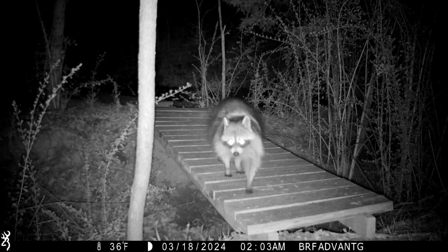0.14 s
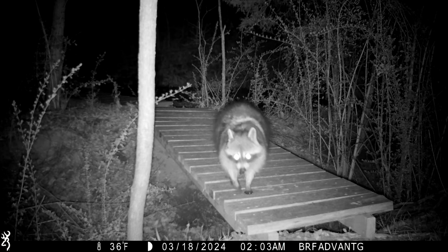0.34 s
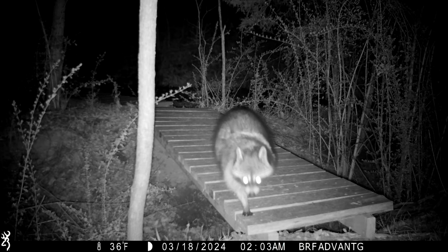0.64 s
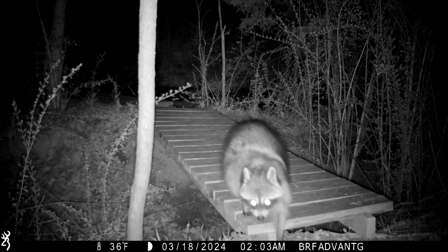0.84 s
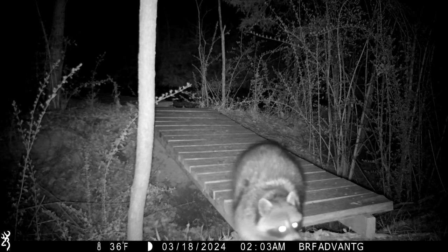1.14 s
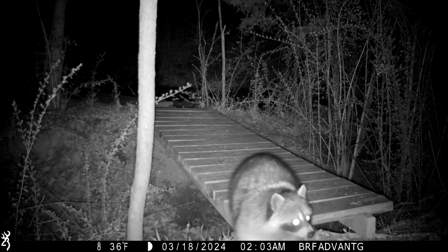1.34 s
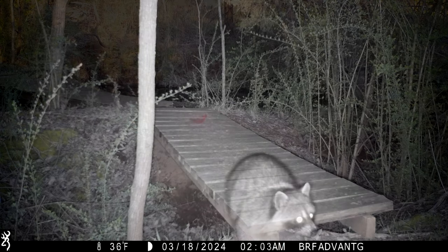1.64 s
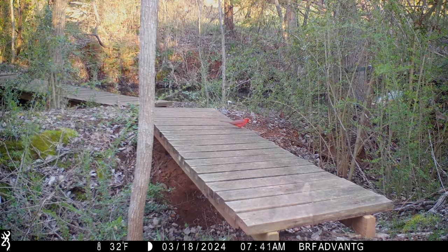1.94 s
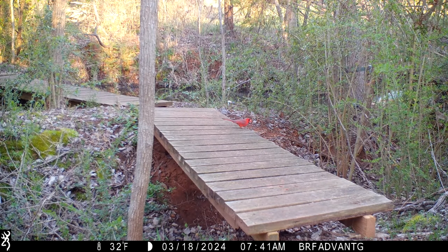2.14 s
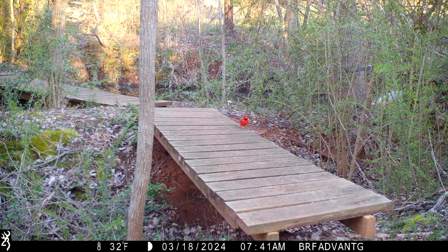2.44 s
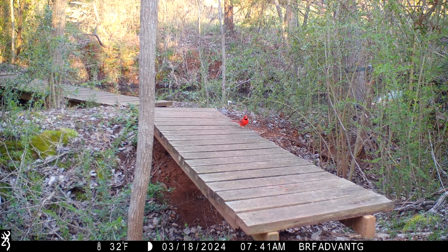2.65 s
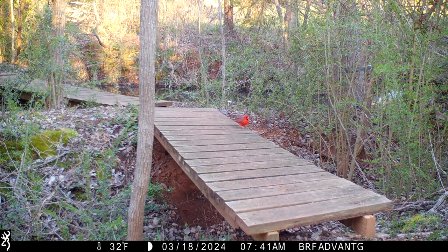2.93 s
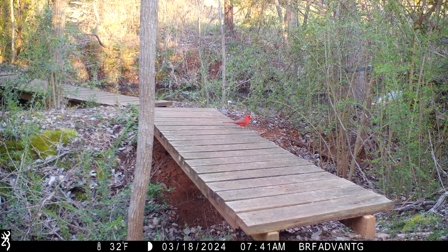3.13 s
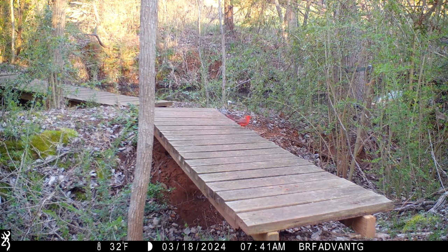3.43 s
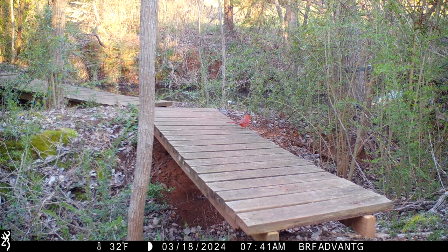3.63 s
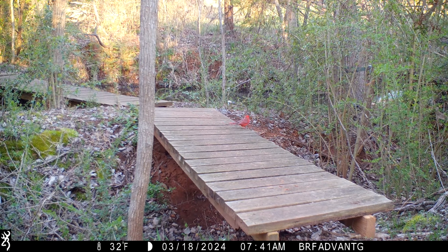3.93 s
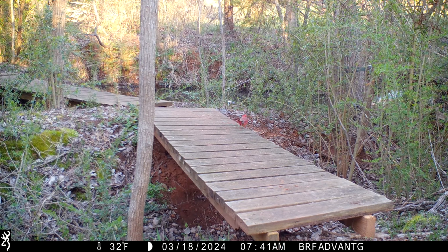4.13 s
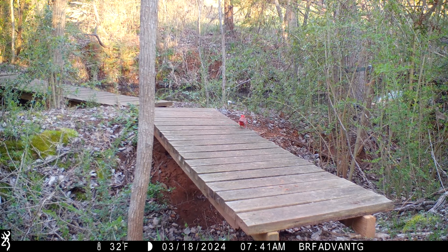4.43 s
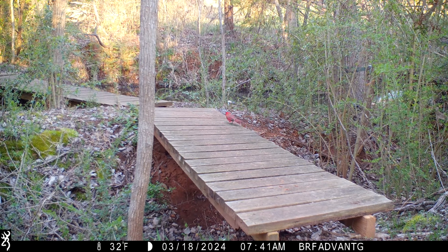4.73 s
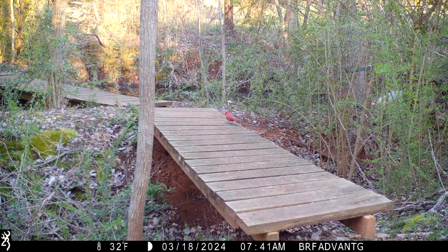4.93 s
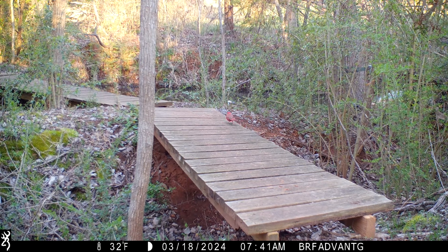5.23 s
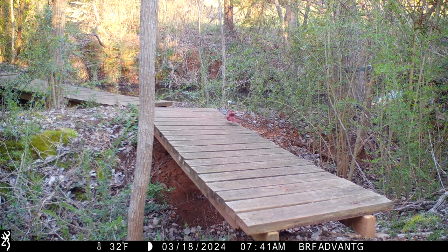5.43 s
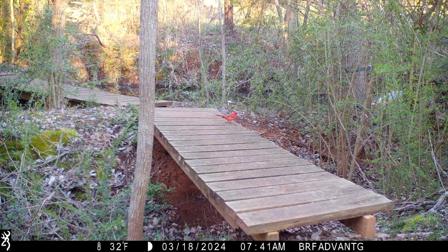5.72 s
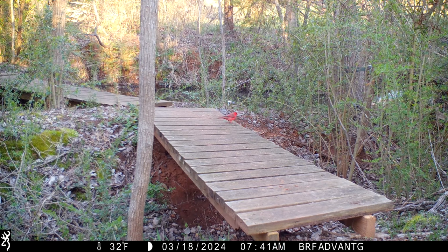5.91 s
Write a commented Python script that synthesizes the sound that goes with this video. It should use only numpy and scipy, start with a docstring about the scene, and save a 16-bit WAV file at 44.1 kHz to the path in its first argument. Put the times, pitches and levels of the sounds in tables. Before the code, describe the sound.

Quiet woodland with low far-off road noise and slight hiss; sparse chips, a rippling wren song, then bold upward-slurred cardinal whistles to the end.

```python
"""In a wood, heard through a trail camera, a wren rolls one phrase over and over,
then a nearer cardinal gives loud rising whoops. Each bird is a gliding near sine with faint overtones.
The wren and cardinal echo off ground and trunks, all song scatters, and small birds add thin chips and lisps.
Far traffic is shaped noise, with wandering engine tones once night gives way to morning.
The camera adds a faint whine with ticks and hiss."""
import sys
import numpy as np
from scipy import signal
from scipy.fft import rfft, irfft, next_fast_len
from scipy.io import wavfile

SR = 44100
rng = np.random.default_rng(int(sys.argv[2]) if len(sys.argv) > 2 else 0)


def to_wav(s):
    """Save 16-bit WAV."""
    ch = np.atleast_2d(s).T  # columns
    pcm = np.round(np.clip(ch, -1, 1) * 32767)  # PCM
    wavfile.write(sys.argv[1], SR, pcm.astype(np.int16))


N = 267687
TIME = np.arange(N) / SR


def from_db(db):
    """Decibels to gain."""
    return 10 ** (np.asarray(db) / 20)


def rms_one(x):
    """Scale to rms 1."""
    return x / np.sqrt(np.mean(x ** 2) + 1e-20)


def along(rows, t):
    """Each column of a curve, read at the times t."""
    seconds, *columns = np.transpose(rows)
    seconds = np.maximum.accumulate(seconds)
    return [np.interp(t, seconds, column) for column in columns]


def at_hz(points, hz):
    """The dB of a spectrum at the given pitches, read on a log-frequency axis."""
    point_hz, db = np.transpose(points)
    return np.interp(np.log(hz + 1e-6), np.log(point_hz), db)


def coloured_noise(spectrum, size=N):
    """Random noise of rms 1, filtered to the shape of the given spectrum."""
    padded = next_fast_len(size)
    hz = np.arange(padded // 2 + 1) * SR / padded
    white = rfft(rng.standard_normal(padded))
    shaped = irfft(white * from_db(at_hz(spectrum, hz)), padded)
    return rms_one(shaped[:size])


def drift(rate):
    """Slow random wander of rms 1, heading for a new value rate times a second."""
    knots = rng.standard_normal(8192)
    return rms_one(np.interp(TIME * rate, np.arange(len(knots)), knots))


def note_time(length):
    """The sample times of one note."""
    return np.arange(max(int(length * SR), 8)) / SR


def slide(length, from_hz, to_hz, middle_s, slide_s, peak_db, peak_s, ends_db):
    """Pitch and level of a note that eases from one pitch towards another and swells once."""
    t = note_time(length)
    progress = (1 + np.tanh((t - middle_s) / slide_s)) / 2
    hz = from_hz + (to_hz - from_hz) * progress
    away_from_peak = np.interp(t, [0, peak_s, length], [1, 0, 1])
    return hz, peak_db - ends_db * away_from_peak ** 2


# The notes of the wren's phrase. Each row: start in seconds into the unstretched phrase, length in seconds,
# from pitch in Hz, to pitch in Hz (both before the repeat's pitch ratio), middle of the slide in seconds,
# slide time in seconds, peak level in dB before the repeat's gain and soft start, time of the peak in seconds,
# and how far the ends lie below the peak in dB.
WREN_PHRASE = [ (.003, 0.039, 4028, 4800, 0.023, .011, -52.5, 0.0025, 16),
               (0.074, 0.061, 3626, 2653, 0.041, 0.016, -45.5, 0.047, 2),
               (0.146, 0.039, 2340, 2794, 0.019, 0.0075, -41.5, 0.019, 7.5),
               (0.224, .068, 1773, 2165, .013, 0.0074, -43.5, 0.034, 6.5),
               (.289, .047, 2520, 2465, .008, .014, -39, .021, 12),
               (.350, 0.025, 3564, 2170, 0.011, .009, -43, .014, 6)]
# The wren's repeats. Each row: start in seconds, stretch of the note spacing, gain in dB, pitch ratio.
WREN_REPEATS = [(2.742, 0.99, -2, 1.014), (3.172, 1.0, -1.5, 1.0), (3.601, .994, -0.5, .998),
                (4.03, 1.018, -0.5, .996), (4.469, 1.015, -0.5, 0.99)]
WREN_STOP_S = 4.66  # no note starts after this
WARM_UP_DB, WARM_UP_S = 10.5, 0.068  # how soft the song starts, and how quickly that wears off


def wren_notes():
    """The phrase rolls round, soft at first, and breaks off half way through the last repeat."""
    for phrase_s, stretch, gain_db, ratio in WREN_REPEATS:
        for offset, *shape in WREN_PHRASE:
            start = phrase_s + stretch * offset
            if start < WREN_STOP_S:
                hz, level_db = slide(*shape)
                soft_db = WARM_UP_DB * np.exp(-(start - WREN_REPEATS[0][0]) / WARM_UP_S)
                yield start, hz * ratio, level_db + gain_db - soft_db


KNEE_HZ, SWEEP_EASE = 2500, 1.22  # where the sweep ends, and the bend of its path
JUMP_S, JUMP_EASE = .0122, .75
# a whoop that starts at the usual pitch tops out at TOP_HZ; one that starts higher ends higher
TOP_HZ, TOP_FOLLOWS, USUAL_START_HZ = 3070, .25, 1850
SWELL_DB, SWELL_EASE = 12.5, 1.7


def whoop(start_hz, sweep_s, peak_db):
    """Pitch and level of a whoop: a swelling upward sweep to a knee, then a quick jump to the top."""
    t = note_time(sweep_s + JUMP_S)
    to_go = np.clip(1 - t / sweep_s, 0, 1)
    jump = np.clip((t - sweep_s) / JUMP_S, 0, 1)
    top_hz = TOP_HZ + TOP_FOLLOWS * (start_hz - USUAL_START_HZ)
    sweep_hz = KNEE_HZ - (KNEE_HZ - start_hz) * to_go ** SWEEP_EASE
    hz = sweep_hz + (top_hz - KNEE_HZ) * jump ** JUMP_EASE
    return hz, peak_db - SWELL_DB * to_go ** SWELL_EASE


# The microphone's response, with a hollow near 6 kHz; it weighs the flicks and the overtones.
# Each row: frequency in Hz, response in dB.
MICROPHONE = [(3000, 0.5), (4200, -5), (5200, -20), (6500, -31.5), (8200, -21.5), (10000, -6.5),
              (13000, -2), (18000, -61)]
FLICK_S, FLICK_FROM_HZ, SHELF_HZ, PLUNGE_S, DROOP_HZ = .034, 7300, 4114, .0036, 970
FLICK_DB, FLICK_FADE_DB = -43, 10  # level before the microphone and lead-in gain, and fade by the end


def flick(droop_power=6.0):
    """Pitch and level of a flick: it plunges to a shelf, then droops and fades.

    Its high start is faint in the microphone's hollow."""
    t = note_time(FLICK_S)
    plunge = np.exp(-t / PLUNGE_S)
    droop = (t / FLICK_S) ** droop_power
    hz = SHELF_HZ + (FLICK_FROM_HZ - SHELF_HZ) * plunge - DROOP_HZ * droop
    return hz, FLICK_DB - FLICK_FADE_DB * droop + at_hz(MICROPHONE, hz)


# The cardinal's syllables. Each row: whoop start in seconds, start pitch in Hz, sweep length in seconds,
# whoop level in dB, kind of lead-in, lead-in gain in dB. Each whoop starts deeper than the last.
SYLLABLES = [ (4.65, 2230, 0.07, -45, "arch", -9.5), (5.143, 2117, 0.078, -36.5, "arch", -1.5),
             (5.3458, 1930, 0.082, -35, "flick", -0.5), (5.5453, 1872, 0.077, -34, "flick", 2.5),
             (5.744, 1758, 0.074, -34.5, "flick", -0.5), (5.9395, 1690, 0.075, -34, "flick", 2)]
# The thin arched lead-in. Each row: seconds into the note, pitch in Hz, level in dB before the lead-in gain.
ARCH = [(0, 4920, -67.5), (.022, 4860, -59), (.068, 5430, -63), (.077, 5260, -51.5), (.096, 4260, -56),
        (.102, 3850, -60.5)]
LEAD_GAP_S = 0.014  # silence between lead-in and whoop


def cardinal_notes():
    """Each syllable is a high lead-in, a short gap and a whoop."""
    for start, start_hz, sweep_s, peak_db, lead_in, lead_db in SYLLABLES:
        if lead_in == "flick":
            hz, level_db = flick()
        else:
            hz, level_db = along(ARCH, note_time(ARCH[-1][0]))
        yield start - LEAD_GAP_S - len(hz) / SR, hz, level_db + lead_db
        yield start, *whoop(start_hz, sweep_s, peak_db)


# Small birds' chips and soft whistles. Each row: start in seconds, length in seconds, from pitch in Hz,
# to pitch in Hz, middle of the slide in seconds, slide time in seconds, peak level in dB,
# time of the peak in seconds, and how far the ends lie below the peak in dB.
CHIPS = [(1.020, .010, 7000, 4180, .004, .005, -72, .004, 4),
         (1.892, .020, 4700, 7700, 0.0046, 0.0043, -71, .006, 8),
         (2.59, 0.049, 2340, 2515, 0.022, 0.0067, -58.5, .018, 1),
         (2.697, .035, 2420, 2490, 0.02, .006, -59.5, 0.023, 1),
         (3.429, 0.025, 5800, 6870, .001, 0.004, -66.5, .005, 8)]
# A far bird's falling lisp: the same columns without the start; its peak level is before the gain below.
LISP = (.040, 4400, 3550, .025, .012, -63, .015, 10)
# When it lisps. Each row: start in seconds, gain in dB.
LISPS = [(2.589, 3.5), (2.822, 1.5), (2.982, -4), (3.357, -9), (3.549, -8)]


def small_bird_notes():
    """Single chips and soft whistles, and one lisp repeated."""
    for start, *shape in CHIPS:
        yield start, *slide(*shape)
    hz, level_db = slide(*LISP)
    for start, gain_db in LISPS:
        yield start, hz, level_db + gain_db


# Faint overtones of a whistle. Each row: multiple of the pitch,
# level in dB against the fundamental before the microphone's response.
OVERTONES = [(2, -33.5), (3, -43), (4, -50), (5, -51.5)]


def whistles(notes, overtones, waver=0.0018, flutter_db=1.0, edge_s=0.0016):
    """The syrinx gives a near sine that follows each note's pitch and level, never quite steady."""
    out = np.zeros(N)
    unsteady = 1 + waver * drift(250)
    flutter = flutter_db * drift(140)
    for start, hz, level_db in notes:
        t = np.arange(len(hz)) / SR
        span = np.minimum(round(start * SR) + np.arange(len(hz)), N - 1)
        phase = 2 * np.pi * np.cumsum(hz * unsteady[span]) / SR
        tone = np.sin(phase)
        for multiple, overtone_db in overtones:
            k = round(multiple)
            # overtones stand out where the microphone hears them better than the fundamental
            favour_db = at_hz(MICROPHONE, k * hz) - at_hz(MICROPHONE, hz)
            tone += from_db(overtone_db + favour_db) * np.sin(k * phase)
        opening = np.clip(np.minimum(t, t[-1] - t) / edge_s, 0, 1)
        out[span] += tone * opening * from_db(level_db + flutter[span])
    return out


# First reflections, off the ground and near trunks. Each row: delay in seconds, level in dB.
CARDINAL_ECHOES = [(.00262, -3.2), (.00417, -4.8), (.01016, -14), (.01265, -15.8)]
WREN_ECHOES = [(.0007, -6), (.0089, -12)]
# Colour of the scatter among the trees. Each row: frequency in Hz, relative level in dB.
SCATTER = [(1500, 0.5), (2500, 2), (4000, 1.5), (7000, -0.5), (12000, 2)]
THICKET_T60_S = 0.067  # time for the thicket's decay curve to fall by 60 dB


def wood(song, echoes, thicket_db, trees_db, trees_t60, thicket_build_s=0.022, trees_build_s=0.013):
    """Early echoes beat against fast glides; a quick scatter from the thicket and a long one from trees follow."""
    t = TIME[:SR]
    response = np.zeros(SR)
    thicket = (thicket_db, THICKET_T60_S, thicket_build_s)
    trees = (trees_db, trees_t60, trees_build_s)
    for level_db, t60, build_s in (thicket, trees):
        decay = from_db(-60 * t / t60)
        build_up = 1 - np.exp(-t / build_s)
        tail = coloured_noise(SCATTER, size=SR) * decay * build_up
        response += from_db(level_db) * tail / np.linalg.norm(tail)
    response[0] += 1  # the direct sound
    for delay, level_db in echoes:
        response[round(delay * SR)] += from_db(level_db)
    return signal.fftconvolve(song, response)[:N]


# Colour of the far traffic by night and by morning. Each row: frequency in Hz, relative level in dB per Hz.
NIGHT_AIR = [(15, -53), (25, -13.5), (76, -5.5), (111, -8), (202, -6.5), (337, -6.5), (361, -6),
             (461, -3.5), (550, -2.5), (602, -1.5), (981, -3), (1070, -1.5), (2670, -9), (5090, -27.5),
             (6620, -42), (11200, -120)]
MORNING_AIR = [(15, -46), (25, -14.5), (97, -3.5), (119, -9.5), (142, -6.5), (173, -7), (236, -9.5),
               (361, -8.5), (403, -8), (504, -5.5), (821, -4.5), (1030, -6.5), (2290, -9.5), (5090, -30),
               (6620, -44.5), (11200, -120)]
NIGHT_DB, MORNING_DB = -60, -57.5  # levels before the swell
# Night gives way to morning. Each row: time in seconds, morning's share from 0 to 1.
DAWN = [(1.5, 0), (2.0, 1)]
# Slow swell of the rush. Each row: time in seconds, gain in dB.
SWELL = [(0, 0.9), (.6, 1.1), (1.3, 0.96), (2.0, -0.95), (2.6, 0.1), (3.5, 0), (4.3, 0.5), (5.0, -.5),
         (6.0, 0)]


def traffic():
    """A smooth far rush: noise that crossfades from night's colour to morning's, fuller in the bass."""
    morning = np.clip(along(DAWN, TIME)[0], 0, 1)
    night_air = np.sqrt(1 - morning) * from_db(NIGHT_DB) * coloured_noise(NIGHT_AIR)
    morning_air = np.sqrt(morning) * from_db(MORNING_DB) * coloured_noise(MORNING_AIR)
    return (night_air + morning_air) * from_db(along(SWELL, TIME)[0])


# The nearest engine. Each row: time in seconds, pitch in Hz before the wander, level in dB before the fading.
NEAR_DRONE = [(3.7, 80.1, -78), (3.78, 85, -83), (3.86, 84.7, -58), (3.92, 85.4, -73.5),
              (5.83, 84.84, -62.5), (5.88, 85.4, -74.5), (6.05, 87.2, -64)]
# Two fainter engine tones, each a list of rows with the same columns.
FAR_DRONES = [
    [(1.75, 117.7, -76), (2.0, 115.2, -68.5), (3.0, 110.3, -89.5), (3.45, 115.5, -73), (3.8, 112, -92.5),
     (6.0, 109.8, -84)],
    [(1.8, 178.6, -75.5), (2.9, 180, -83.5), (3.6, 178, -97)],
]


def engines(wander=.008, fading_db=1.6, arrival_s=0.3):
    """Only the firing tone of each engine carries this far, fading in and out on the way."""
    out = np.zeros(N)
    for drone in [NEAR_DRONE] + FAR_DRONES:
        hz, level_db = along(drone, TIME)
        phase = 2 * np.pi * np.cumsum(hz * (1 + wander * drift(6.4))) / SR
        arrived = np.clip((TIME - drone[0][0]) / arrival_s, 0, 1)
        gain = from_db(level_db + fading_db * drift(11.0))
        out += np.sqrt(2) * np.sin(phase) * arrived * gain
    return out


WHINE_HZ, FRAME_HZ, FIRST_FRAME_S = 7796.5, 59.4, .0106  # the whine's pitch holds between stumbles
# The camera's whine. Each row: time in seconds, level in dB before the pulsing.
WHINE = [(0, -79.5), (1.6, -79), (2.1, -87), (2.6, -78.5), (6.0, -77.5)]
# When the whine's pitch stumbles. Each row: middle in seconds, length in seconds.
STUMBLES = [(0.527, 0.03), (1.156, 0.023), (1.411, .022), (2.56, 0.037)]
# for a moment the whine pulses with the frames: the middle, and the spread to either side
PULSING_S, PULSING_SPREAD_S = 2.13, 0.34
# Colour of the preamplifier's hiss. Each row: frequency in Hz, relative level in dB per Hz.
HISS = [(5000, -5), (11700, -3.5), (12300, -8.5), (16000, -23.5)]
HISS_DB = -88.5


def camera(stumble_hz=220, scatter_hz=190, jitter_s=.00004, tick_db=-57, tick_low_hz=5500,
           tick_high_hz=9000, pulse_db=8):
    """A thin electronic whine ticks and flips its sign on every frame, over the preamplifier's hiss."""
    frame_time = TIME - FIRST_FRAME_S
    flips = np.sign(np.sin(np.pi * FRAME_HZ * (frame_time + jitter_s * drift(85))))
    stumbling = sum(np.abs(TIME - s) < length / 2 for s, length in STUMBLES)
    hz = WHINE_HZ + stumbling * (stumble_hz + scatter_hz * drift(300))
    whine = np.sqrt(2) * np.sin(2 * np.pi * np.cumsum(hz) / SR) * flips

    near_flip = np.cos(np.pi * FRAME_HZ * frame_time) ** 10
    pulsing = np.exp(-((TIME - PULSING_S) / PULSING_SPREAD_S) ** 2)
    whine = whine * from_db(pulse_db * near_flip * pulsing)

    switches = np.diff(flips, prepend=flips[0]) / 2
    tick_band = signal.butter(2, [tick_low_hz, tick_high_hz], "band", fs=SR, output="sos")
    ticks = signal.sosfilt(tick_band, switches)
    hiss = from_db(HISS_DB) * coloured_noise(HISS)
    return from_db(along(WHINE, TIME)[0]) * whine + from_db(tick_db) * ticks + hiss


def scene():
    """The farther a bird sits, the more long echo its song has; the rest lies under them, in mono."""
    wren = wood(whistles(wren_notes(), OVERTONES), WREN_ECHOES,
                thicket_db=-8, trees_db=-7.5, trees_t60=0.65)
    cardinal = wood(whistles(cardinal_notes(), OVERTONES), CARDINAL_ECHOES,
                    thicket_db=-5, trees_db=-10.5, trees_t60=0.35)
    small_birds = wood(whistles(small_bird_notes(), []), [],
                       thicket_db=-6, trees_db=-3.5, trees_t60=0.45)
    return (wren + cardinal + small_birds + traffic() + engines() + camera())[None]


CUTOFF_HZ = 15700


def record(dry):
    """A steep low-pass filter cuts the top."""
    low_pass = signal.ellip(10, .1, 80, CUTOFF_HZ, fs=SR, output="sos")
    return signal.sosfilt(low_pass, dry)


dry = scene()
out = record(dry)
to_wav(out)
```